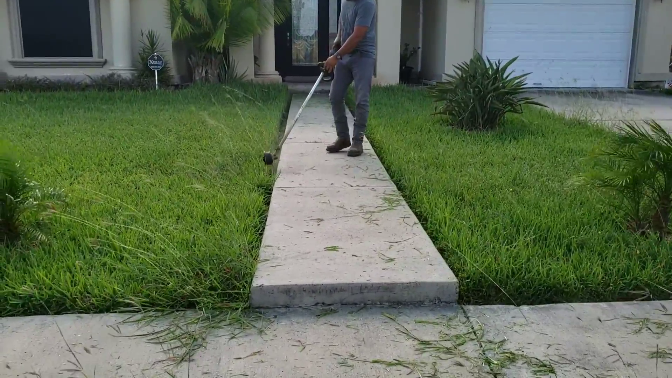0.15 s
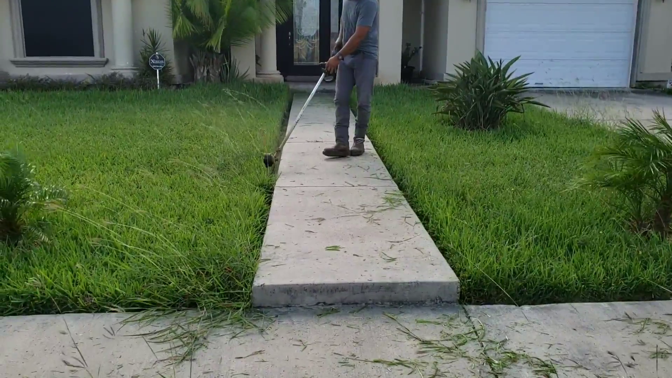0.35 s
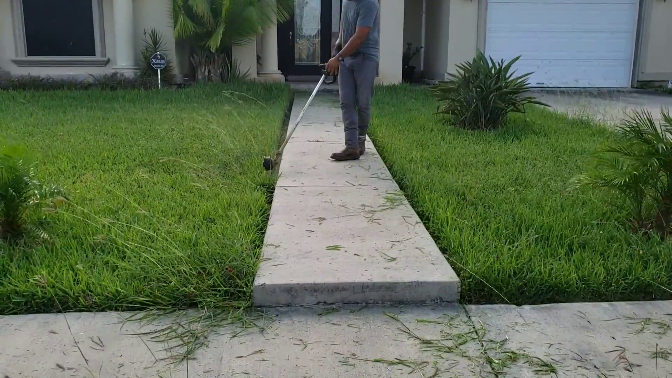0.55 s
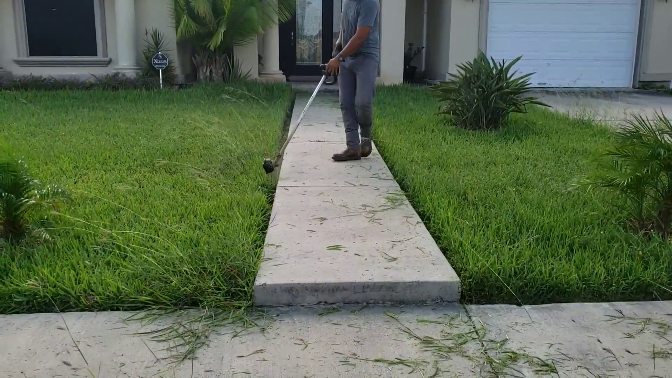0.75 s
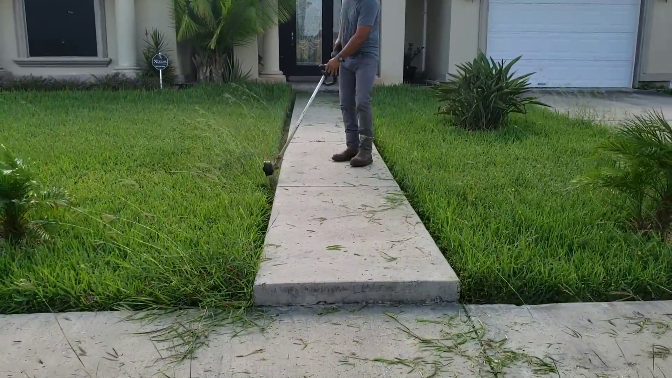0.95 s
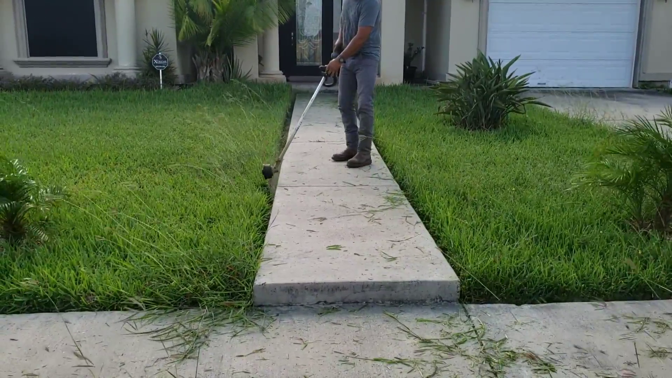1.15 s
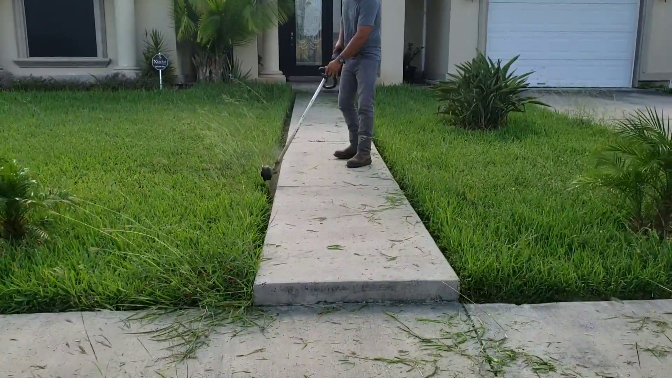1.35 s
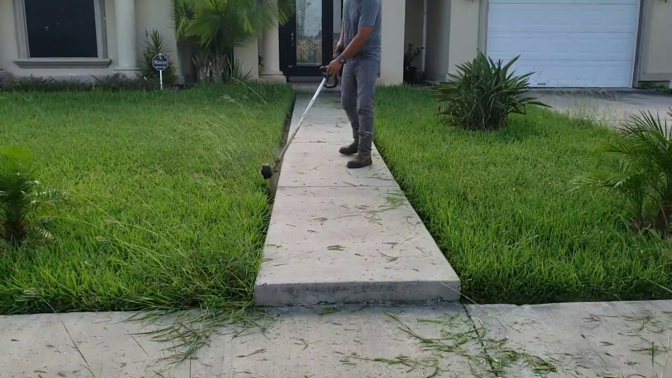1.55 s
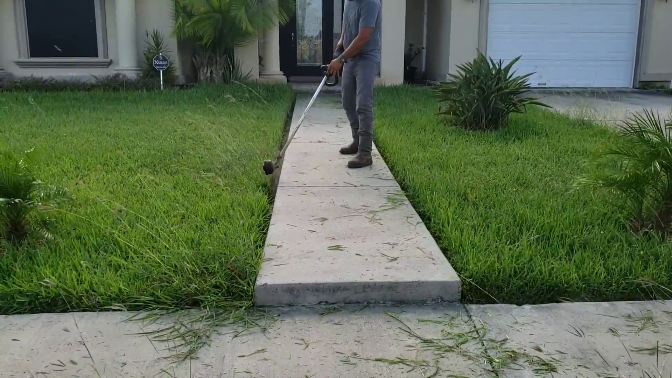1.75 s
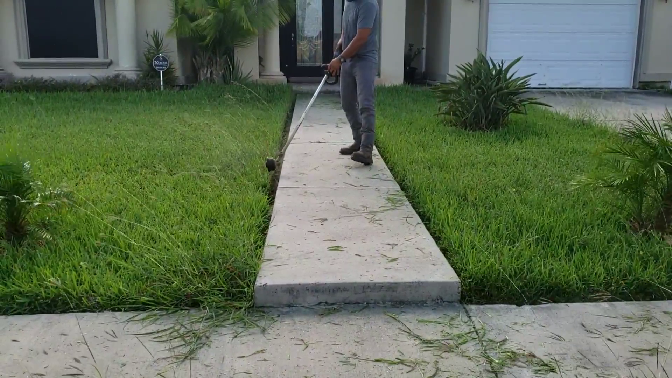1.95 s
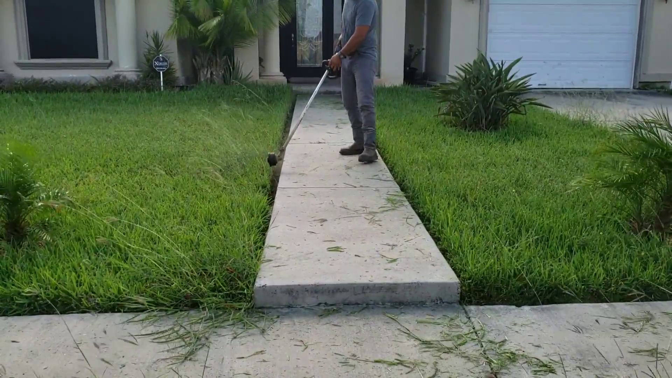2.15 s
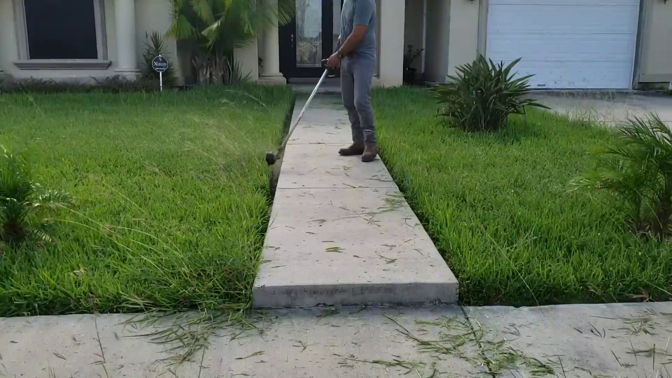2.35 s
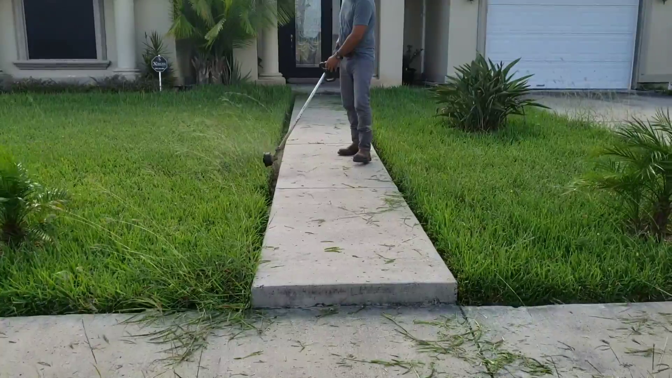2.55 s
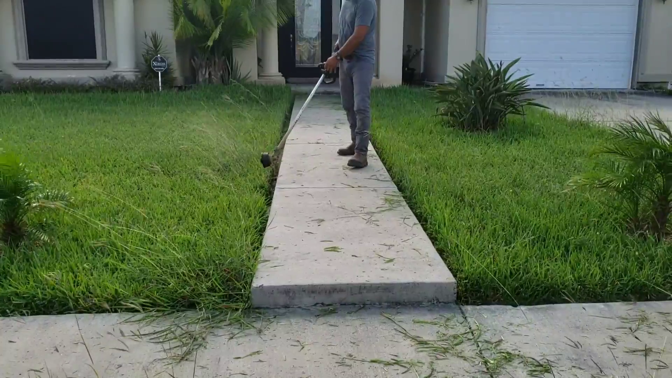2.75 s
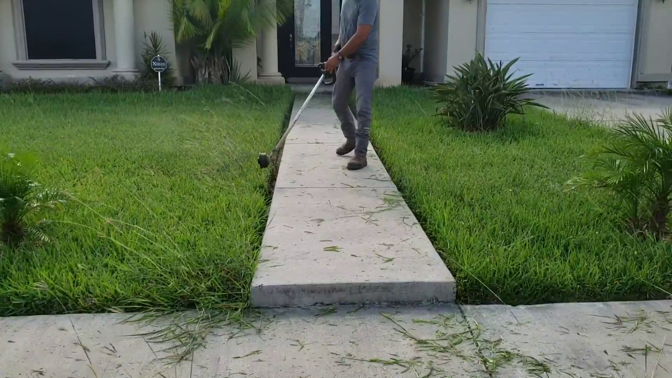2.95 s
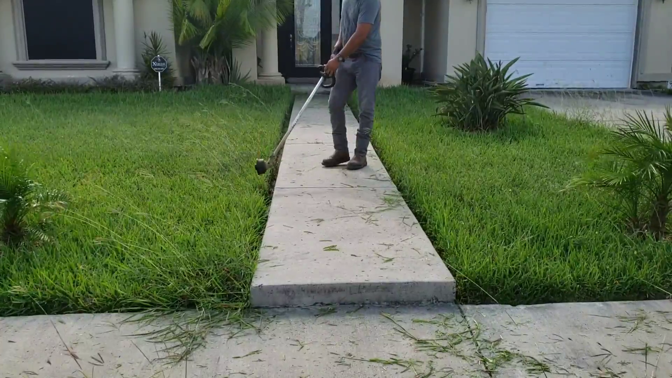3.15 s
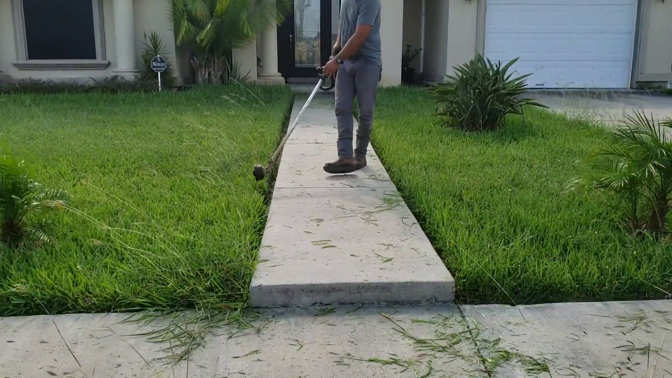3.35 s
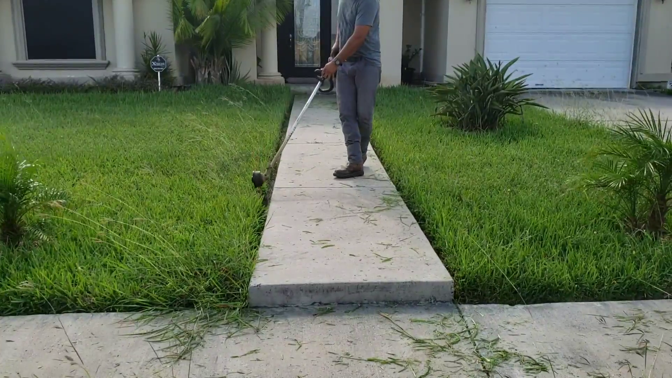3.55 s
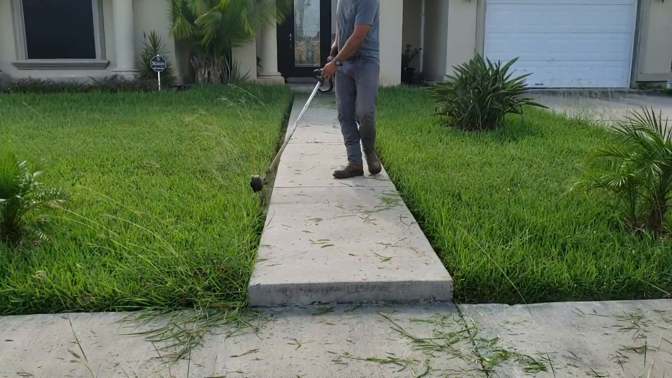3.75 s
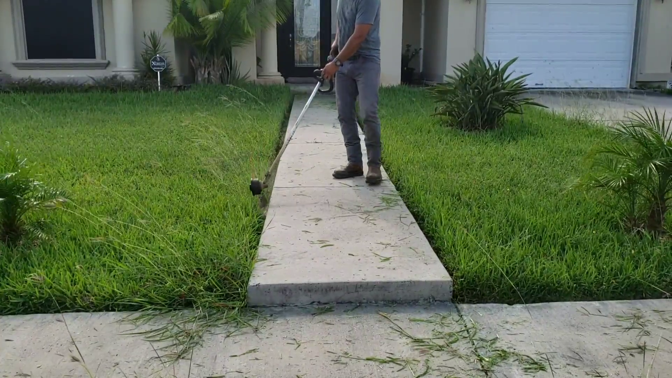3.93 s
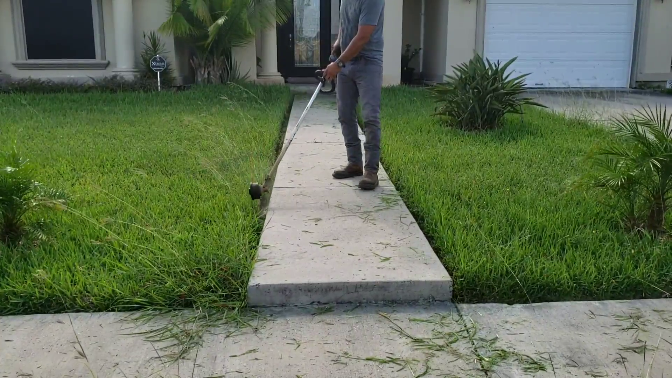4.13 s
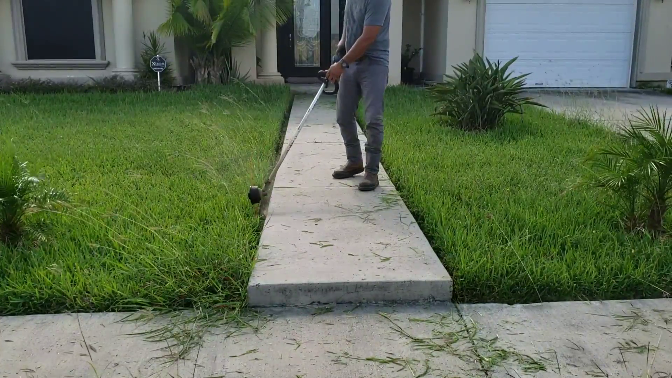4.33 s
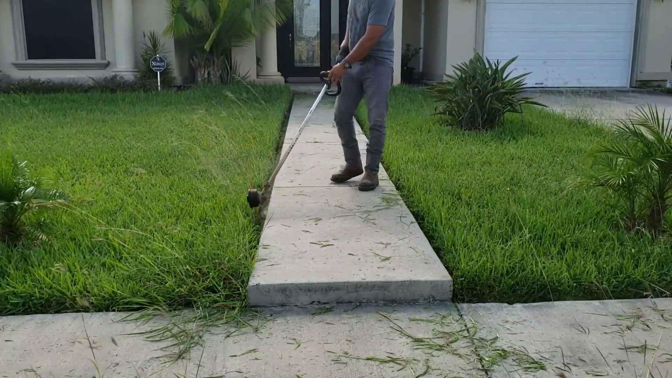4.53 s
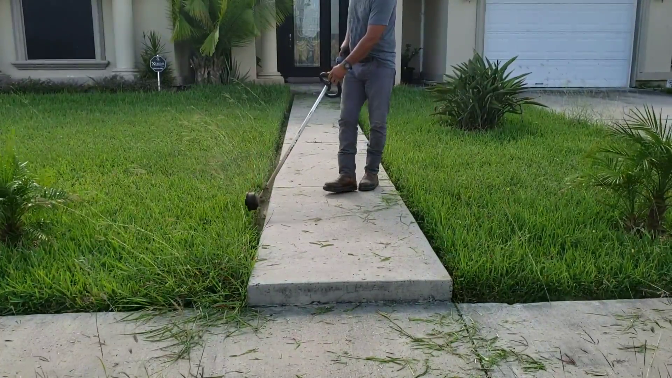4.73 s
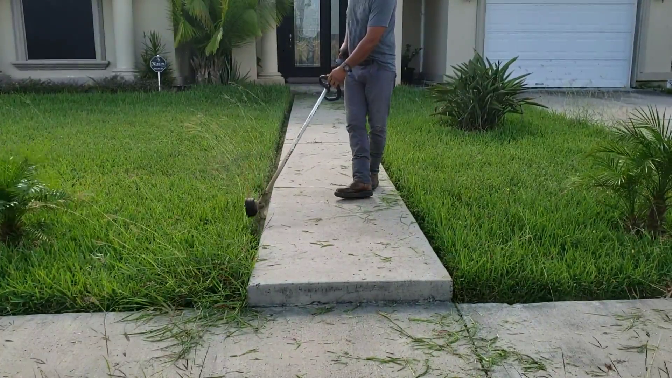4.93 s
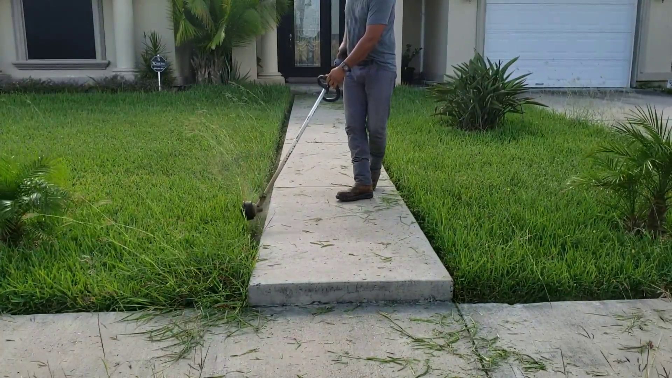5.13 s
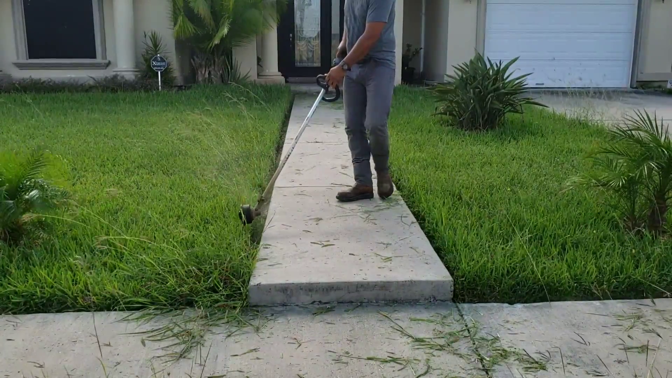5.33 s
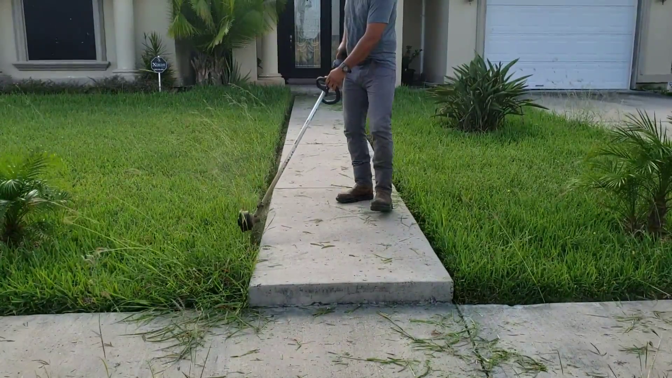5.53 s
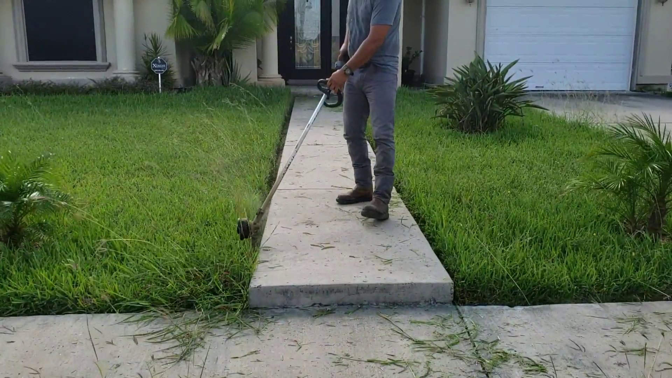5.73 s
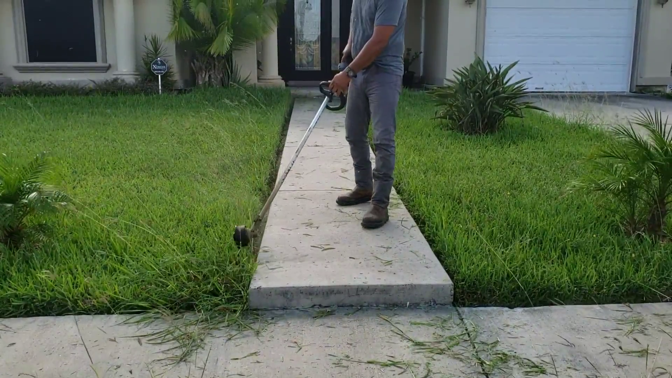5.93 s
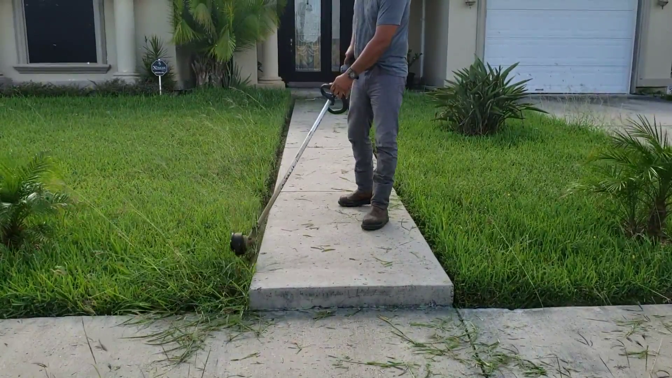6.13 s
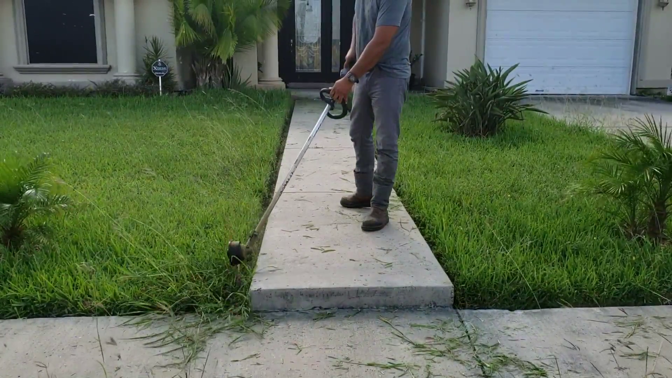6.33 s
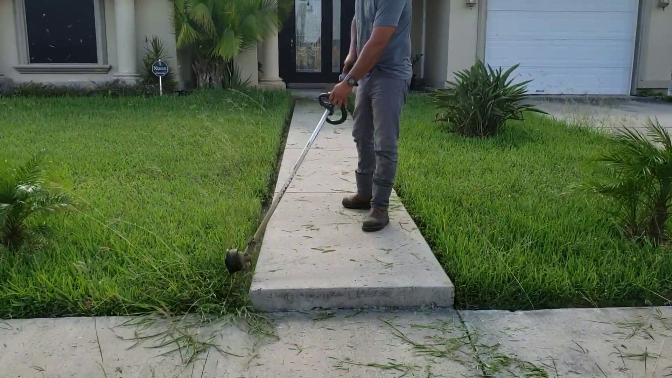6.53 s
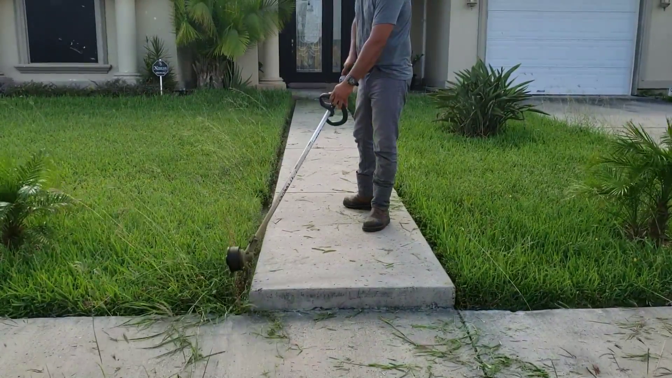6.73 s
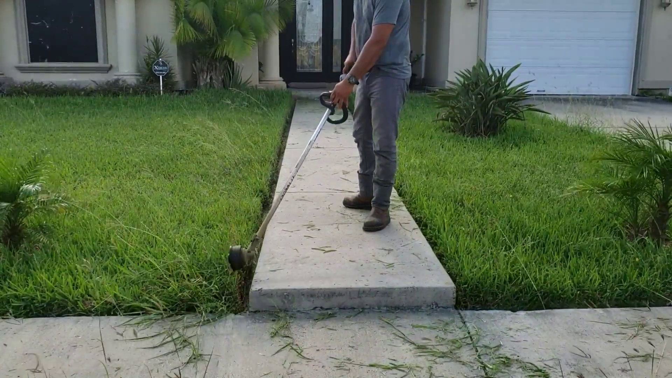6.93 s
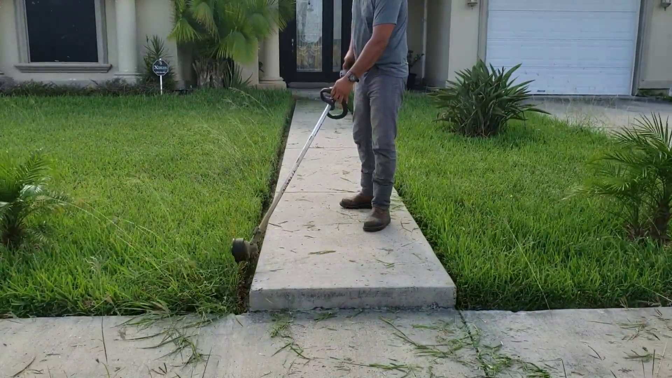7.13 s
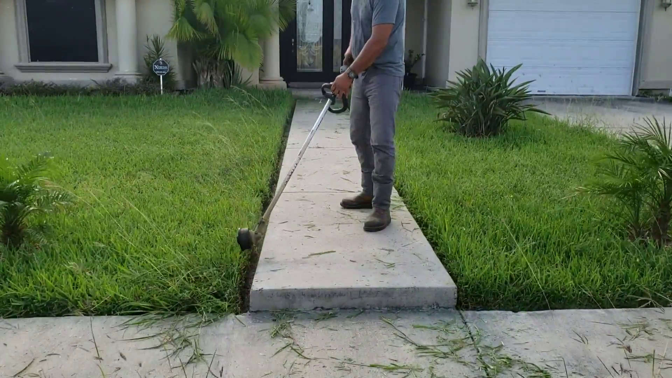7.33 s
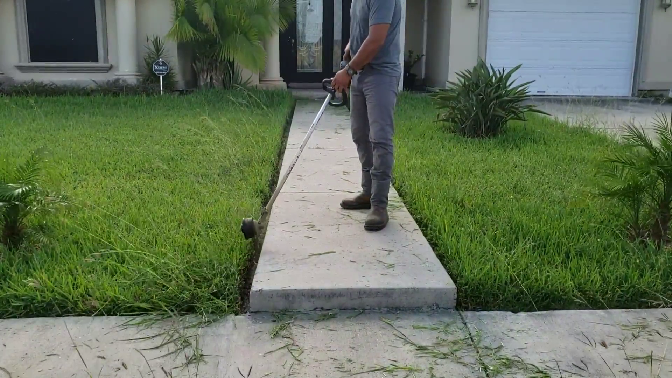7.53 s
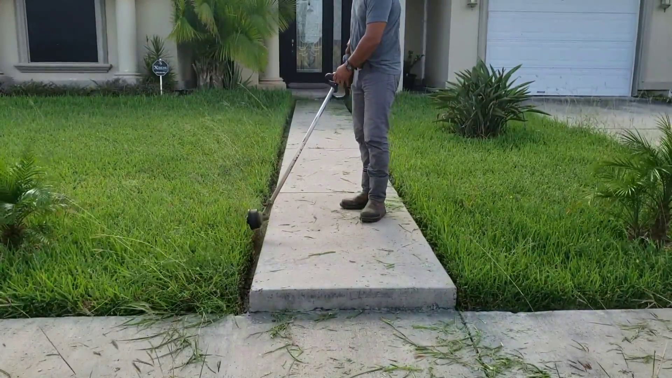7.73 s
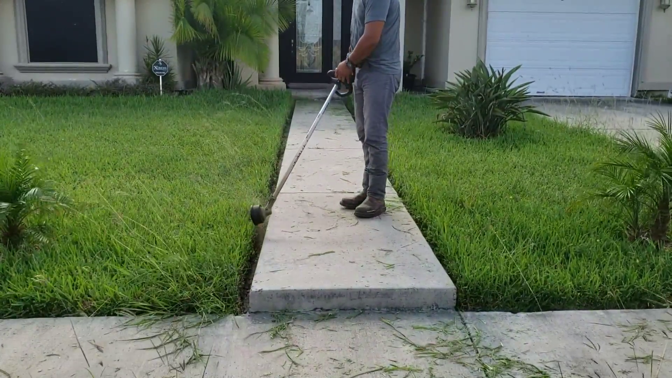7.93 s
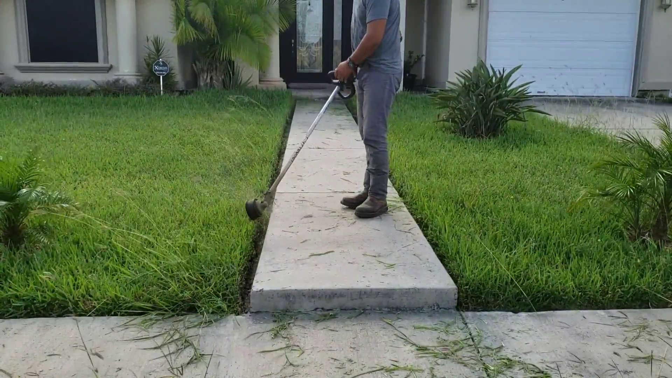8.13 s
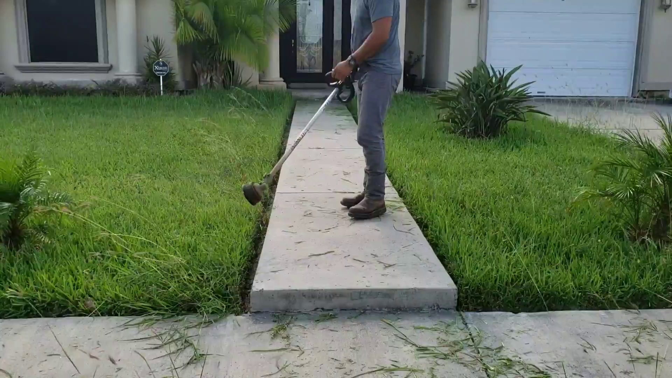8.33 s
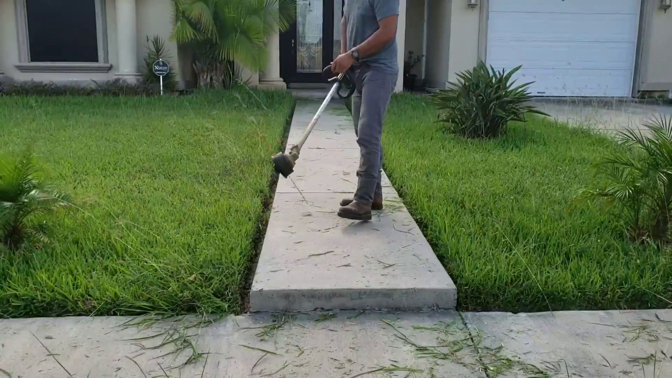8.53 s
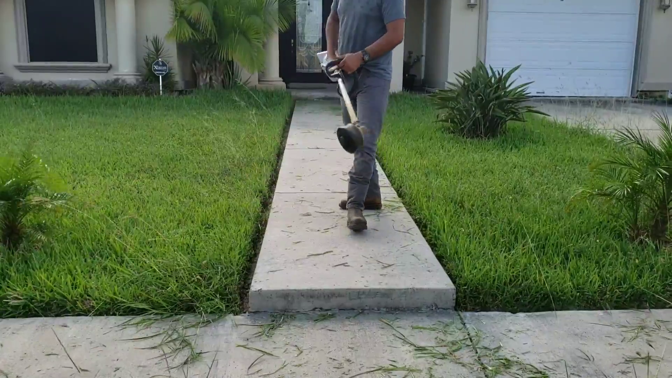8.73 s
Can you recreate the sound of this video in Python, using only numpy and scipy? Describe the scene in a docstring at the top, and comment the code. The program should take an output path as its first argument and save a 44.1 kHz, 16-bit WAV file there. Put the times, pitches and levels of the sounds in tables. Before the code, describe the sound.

Close outdoor grass trimming: steady droning small engine, bright fluttering line hiss, hard edge rasps and ticks, with brief dips in pitch and a whistling finish.

```python
"""Edge of a lawn by a paved path and a house front; a stereo microphone a few metres from a man trimming.
His four-stroke petrol string trimmer eases and pulls again; exhaust pulses ring a muffler and drone.
Two nylon lines shred grass in bursts of tiny snaps, whistle by shedding vortices and hum as they pass.
The bevel gear whines at its tooth rate; concrete cracks, grit ticks, and at the end the head lifts clear.
Wind buffets the microphone as lumpy low noise; the house front answers with a short scattered tail."""
import sys
import numpy as np
from scipy import signal
from scipy.fft import rfft, irfft, next_fast_len
from scipy.io import wavfile

SR = 44100
rng = np.random.default_rng(int(sys.argv[2]) if len(sys.argv) > 2 else 0)


def digitize_waveform(pressure):
    """Quantize a signal to 16-bit integers and store it at the path in sys.argv[1].

    Rows of a 2-D input are taken as channels; values are limited to [-1, 1].
    """
    field = np.atleast_2d(pressure).T
    bounded = np.clip(field, -1, 1)
    quanta = np.round(bounded * 32767).astype(np.int16)
    wavfile.write(sys.argv[1], SR, quanta)


N = 391608


def amp(db):
    """Decibels to gain."""
    return 10 ** (np.asarray(db) / 20)


def unit(x):
    """Scale to rms 1."""
    return x / np.sqrt(np.mean(x ** 2) + 1e-20)


def along(points, hz):
    """Read (f/Hz, value) points on a log frequency axis."""
    f, v = np.transpose(points)
    return np.interp(np.log(hz + 1), np.log(f + 1), v)


def curves(rows):
    """One value per sample for each column after the time."""
    s, *cols = np.transpose(rows)
    return [np.interp(np.arange(N) / SR, s, c) for c in cols]


def wobble(rate):
    """A smooth random curve, rate knots a second."""
    size = int(N * rate / SR) + 8
    fine = signal.resample(rng.standard_normal(size), 8 * size)
    return np.interp(np.arange(N) * 8 * rate / SR, np.arange(len(fine)), fine)


def filtered(x, response):
    """Multiply the spectrum of x by a response of frequency."""
    m = next_fast_len(N + 8192)
    return irfft(rfft(x, m) * response(np.fft.rfftfreq(m, 1 / SR)), m)[..., :N]


def coloured(x, spectrum):
    """x through a causal minimum-phase filter with the given (f/Hz, level/dB) spectrum, at rms 1."""
    size = 4096
    log_gain = np.log(amp(along(spectrum, np.fft.rfftfreq(size, 1 / SR))))
    # folding the cepstrum forward in time makes the filter causal
    cepstrum = irfft(log_gain)
    cepstrum[1:size // 2] *= 2
    cepstrum[size // 2 + 1:] = 0
    impulse = irfft(np.exp(rfft(cepstrum)))
    return unit(signal.oaconvolve(x, impulse[None], axes=1)[:, :N])


def noise():
    """Two unrelated white noises."""
    return rng.standard_normal((2, N))


def eddies(pitch, band_hz):
    """A band of noise around a moving pitch, at rms 1."""
    slow_noise = filtered(noise(), lambda hz: np.exp(-(hz / band_hz) ** 2))
    return unit(slow_noise * np.cos(2 * np.pi * np.cumsum(pitch) / SR))


def spread(pair, side_db):
    """The first signal in the middle, the second as width."""
    side = amp(side_db) * pair[1]
    return np.array([pair[0] + side, pair[0] - side])


def per_cycle(cycles):
    """A new normal random value for every cycle."""
    return rng.standard_normal(4000)[cycles.astype(int) % 4000]


# faint outdoor background: f/Hz, density/dB
AIR = [(100, -3), (800, -7), (2500, 1), (12000, -17), (15000, -18)]
AIR_DB = -62


def outdoor_air():
    """Distant outdoor air as a faint, steady coloured noise, unrelated at the two ports."""
    return amp(AIR_DB) * coloured(noise(), AIR)


# wind buffeting the microphone: t/s, relative level/dB
WIND = [(0, -39), (1.2, -37.5), (1.9, -41.5), (2.5, -40.5), (3.35, -39), (3.85, -48.5), (4.95, -53.5),
        (5.35, -44), (6.1, -51.5), (6.9, -57), (7.6, -52), (8.15, -42.5), (8.6, -43.5), (8.88, -53)]
# puffs of wind on the microphone: t/s, relative level/dB, half length/s, flutter relative to the puff/dB
PUFFS = [(0.176, -35, .025, -8), (0.347, -33, 0.014, -16), (0.451, -27.5, 0.016, 2),
         (0.526, -26.5, .022, -2.5), (0.644, -28.5, .018, -7), (.735, -38, .014, 0), (.885, -37, .02, -1),
         (1.082, -29.5, 0.043, -6), (1.192, -27.5, 0.019, -1.5), (1.26, -28.5, .015, -4),
         (1.303, -31, .013, 3), (1.567, -29, 0.028, -7), (1.706, -28.5, 0.014, -5), (1.93, -37, 0.014, 0),
         (2.062, -25.5, 0.019, -3.5), (2.385, -31.5, .06, -1), (2.514, -29.5, 0.023, 0),
         (2.56, -26.5, .016, -2), (2.99, -32.5, 0.064, -1), (3.118, -32, 0.024, -5), (3.332, -33, .03, -14),
         (7.151, -42, .022, -5), (7.818, -33.5, .018, -6.5)]
# spectra of the steady buffeting, the puffs and the bright flutter on them: f/Hz, relative density/dB
BUFFET = [(20, -24), (45, -8), (90, 0.5), (180, -0.5), (300, -6.5), (600, -18), (1200, -25.5), (3000, -29)]
PUFF = [(30, -12), (100, 0.5), (200, 1), (400, -10.5), (900, -26), (3000, -56)]
FLUTTER = [(80, -14), (250, 2), (450, -1), (850, 0.5), (1400, -11.5), (3000, -64)]


def wind():
    """Lumpy turbulence pushes each microphone port separately; puffs thump, with a brighter flutter on top."""
    t = np.arange(N) / SR
    lumps = amp(4.7 * np.array([wobble(50), wobble(50)]))
    rumble = amp(curves(WIND)[0] + 2.5) * unit(lumps * coloured(noise(), BUFFET))
    puff_force, flutter_force = np.zeros(N), np.zeros(N)
    for s, db, half, bright_db in PUFFS:
        swell = amp(db - 2.5) * np.exp(-((t - s) / half) ** 2)
        puff_force += swell
        flutter_force += swell * amp(bright_db)
    puffs = puff_force * coloured(noise(), PUFF) + flutter_force * coloured(noise(), FLUTTER)
    return rumble + puffs * amp(2.5 * np.array([wobble(90), wobble(90)]))


# decay of the tail from house front and path: f/Hz, time to fall 60 dB/s
YARD = [(200, 0.053), (2000, 0.099), (12000, 0.02)]


def yard(x):
    """The house front and the path scatter a short tail, ever new as the man moves."""
    hop = SR // 8
    out = np.zeros((2, N + SR))
    padded = np.pad(x, ((0, 0), (hop, 2 * hop)))
    window = np.sqrt(np.hanning(2 * hop))
    for start in range(0, N + hop, hop):
        hz, t, z = signal.stft(rng.standard_normal((2, SR // 4)), SR, nperseg=256)
        decay = amp(-60 * t / along(YARD, hz)[:, None])
        tail = signal.istft(z * decay, SR, nperseg=256)[1]
        tail = tail / np.linalg.norm(tail[0])
        piece = signal.fftconvolve(padded[:, start:start + 2 * hop] * window, tail, axes=1)
        out[:, start:start + piece.shape[1]] += piece
    return out[:, hop:hop + N]


# head speed that full throttle reaches under the changing load: t/s, turns per second
SPEED = [(0, 88.2), (.22, 87.8), (.45, 89.7), (.7, 87.8), (.79, 85), (.9, 84.6), (1.18, 87.1), (1.32, 86),
         (1.87, 83), (2.08, 85), (2.3, 83.7), (2.52, 79), (2.8, 83.7), (3.5, 85.2), (3.7, 87.5), (4, 87),
         (4.2, 87.5), (4.35, 86.3), (4.5, 87.8), (4.97, 89.4), (5.2, 84.7), (5.6, 88.2), (5.72, 86.9),
         (6, 86.1), (6.42, 85.8), (6.55, 86.6), (6.7, 85), (7.1, 88.8), (7.95, 88.8)]
# the trigger is let go and squeezed again: off t/s, on t/s
EASES = [(1.32, 1.548), (2.81, 3.166), (6.7, 6.92), (7.96, 8.5), (8.75, 8.85)]
COAST_S, SPIN_UP_S = .48, .19  # time constants of slowing and speeding up
THROTTLE_S, PICKUP_S = 0.11, .04  # lever travel time; delay before the engine pulls again


def throttle():
    """The head coasts when the trigger is let go and spins up again; surge is how hard the engine pulls."""
    t = np.arange(N) / SR
    share, lever = np.ones(N), np.ones(N)  # share of full speed; lever position 0-1
    for off, on in EASES:
        coast = np.interp(off, t, share) * np.exp(-(np.clip(t, off, on) - off) / COAST_S)
        recovering = 1 - (1 - coast) * np.exp(-np.maximum(t - on, 0) / SPIN_UP_S)
        share = np.where(t < off, share, recovering)
        travel = np.maximum(off + THROTTLE_S - t, t - on - PICKUP_S) / THROTTLE_S
        lever = np.where(t < off, lever, np.clip(travel, 0, 1))
    surge = lever * (1 - share)
    return curves(SPEED)[0] * share, surge, lever


FULL_SPEED = 87  # head turns per second at which effort adds no speed-dependent change


def effort(speed, surge, slope_db, surge_db):
    """Level change in dB: slope_db per tenfold speed, plus surge_db times the engine's surge."""
    return slope_db * np.log10(speed / FULL_SPEED) + surge_db * surge


HEAD_TEETH, PINION_TEETH = 21, 15


def power_strokes(turns):
    """The engine fires every second crank turn and drives the head through the bevel gear."""
    return turns * HEAD_TEETH / PINION_TEETH / 2


# exhaust resonances, others favoured by the ground reflection as the man comes nearer:
# f/Hz, width/Hz, far level/dB, near level/dB
PIPE = [(120, 29, -3, -8), (240, 70, -5, -9), (670, 30, -7, 3), (735, 34, 4, 5.5), (840, 40, -1, 5),
        (912, 40, 1.5, 1), (985, 50, -2, -8)]


def muffler(fired, column):
    """Firing pulses ring the exhaust resonances, with the strengths of one column."""
    def ring(f):
        total = 0
        for k, row in enumerate(PIPE):
            damping = 1j * f * row[1]
            total = total + amp(row[column]) * damping / (row[0] ** 2 - f * f + damping) * (-1) ** k
        return total
    return unit(filtered(fired, ring))


# engine noise as the man turns and walks: t/s, relative gas rush level/dB, relative rattle level/dB
ENGINE = [(0, -45.5, -37), (1.2, -38, -37.5), (1.9, -41.5, -41.5), (2.45, -36.5, -36), (2.9, -42.5, -45.5),
          (3.5, -40.5, -40.5), (4, -48, -42), (4.8, -55, -42.5), (5.8, -42, -41), (7.1, -54, -50.5),
          (8, -45.5, -42), (8.6, -37, -39.5), (8.88, -67, -42.5)]
# exhaust note as the man turns and walks, before throttle and effort: t/s, level/dB
NOTE = [(0, -51), (1.2, -49), (1.8, -52), (2.1, -50), (2.8, -52), (3.2, -51), (3.5, -46), (3.9, -46),
        (4.3, -46.5), (5, -47.5), (6.2, -47.5), (6.7, -52), (7.3, -56), (7.8, -51), (8.3, -52), (8.62, -41),
        (8.74, -48), (8.88, -54)]
# how far he has come along the path: t/s, nearness 0-1
APPROACH = [(4.9, 0), (5.4, 1)]
# spectra of the gas rush through the muffler and of the mechanical rattle: f/Hz, relative density/dB
MUFFLER = [(50, -38), (120, -8.5), (185, -3), (250, -2.5), (370, -5.5), (520, -25), (620, -8), (720, 2),
           (900, 1), (1060, -5.5), (1250, -5), (2000, -18.5), (3200, -36), (6000, -45)]
RATTLE = [(300, -10), (550, -14), (750, 4.5), (1050, -2), (1400, -2.5), (1900, 4.5), (2250, -2.5),
          (2600, 1.5), (3000, -10.5), (4500, 0.5), (9000, -42)]
SHUT_DB = -13  # drop of the exhaust note and of the hum's overtones with the throttle shut
MISFIRE = .16  # timing scatter of the firings with the throttle shut, in cycles


def engine(speed, surge, turns, lever):
    """One exhaust pulse every second crank turn rings the muffler; gas rush, valves and fan add noise."""
    gas_db, rattle_db = curves(ENGINE) + effort(speed, surge, slope_db=19.0, surge_db=22)
    firings = power_strokes(turns)
    # starved of fuel, it fires weakly and unevenly
    shut = 1 - lever
    uneven = np.maximum.accumulate(firings + MISFIRE * shut * wobble(60))
    strength = amp((.35 + 3 * shut) * per_cycle(uneven))
    fired = np.diff(np.floor(uneven), prepend=0) * strength
    near = curves(APPROACH)[0]
    note_db = curves(NOTE)[0] + SHUT_DB * shut + effort(speed, surge, slope_db=65, surge_db=8)
    ringing = (1 - near) * muffler(fired, column=2) + near * muffler(fired, column=3)
    note = amp(note_db) * unit(ringing)
    gate = np.exp(0.6 * np.cos(2 * np.pi * firings))  # the noise swells at each firing
    gas = amp(gas_db - 5.5 + wobble(16)) * coloured(gate * noise(), MUFFLER)
    rattle = amp(rattle_db - 2.0 + 2.5 * wobble(14)) * coloured((1.5 + gate) * noise(), RATTLE)
    return note + spread(gas + rattle, -13.5)


# bevel gear whine as it turns toward and away from the microphone: t/s, relative level/dB
GEAR = [(0, -46), (1, -46), (2.1, -48.5), (2.75, -48.5), (2.95, -60), (3.5, -46.5), (4.2, -50), (4.9, -49),
        (5.7, -49.5), (6.1, -57), (7.45, -64), (7.58, -49.5), (8, -52), (8.6, -75)]
GEAR_SLOPE_DB = 73  # the whine's growth per tenfold speed


def gear_whine(speed, turns):
    """Meshing bevel teeth whine at the tooth rate, swelling once a turn and louder with speed."""
    mesh = 2 * np.pi * HEAD_TEETH * turns + .2 * wobble(40)
    level_db = curves(GEAR)[0] + GEAR_SLOPE_DB * np.log10(speed / FULL_SPEED)
    once_a_turn = 1 + .3 * np.sin(2 * np.pi * turns)
    return amp(level_db + 1.0 * wobble(14)) * once_a_turn * np.sin(mesh)


# hum as the head is swung and tilted: t/s, relative fundamental level/dB, overtone level/dB, tilt 0-1
SWING = [(0, -48, -54, 0), (.5, -49, -57, .5), (1.25, -50, -55, .5), (1.8, -51, -58, 0),
         (2.35, -48, -53, .2), (2.75, -52, -58, 0), (3.5, -51, -55, 0), (3.8, -52, -52.5, 0),
         (4.1, -53.5, -60, .3), (4.9, -52.5, -61, 0), (5.3, -54.5, -57, .2), (6.2, -54.5, -56, .5),
         (6.55, -56, -48.5, 1), (6.75, -58, -51, 1), (7.05, -60, -62, .3), (7.45, -57, -60, .3),
         (7.75, -54, -52, 0), (8.2, -55, -55, 0), (8.6, -55, -57, .4)]
# overtones of the line-pass rate: multiple, level upright/dB, level tilted/dB
HUM = [(2, -15, -14), (3, -14, -9), (4, -10, -4), (5, 0, -2.5), (6, -3, 1.5), (7, -8, -6), (8, -6.5, -9)]
# the ground reflection cancels the overtones here: f/Hz, level change/dB
GROUND_DIP = [(370, 0), (440, -9), (600, -11), (680, 0)]
HUM_SLOPE_DB = 75  # the hum's growth per tenfold speed


def line_hum(speed, turns, lever):
    """Two lines push the air twice a turn; overtones follow the tilt and drop as the throttle shuts."""
    fundamental_db, overtones_db, tilt = curves(SWING)
    overtones_db = overtones_db + SHUT_DB * (1 - lever)
    partials = [(1, fundamental_db)]
    for k, upright, tilted in HUM:
        shape_db = (1 - tilt) * upright + tilt * tilted
        partials.append((k, overtones_db + shape_db + along(GROUND_DIP, 2 * k * speed)))
    hum = 0
    for k, db in partials:
        hum = hum + amp(db + wobble(5)) * np.sin(4 * np.pi * k * turns + .15 * wobble(12))
    return hum * amp(HUM_SLOPE_DB * np.log10(speed / FULL_SPEED))


def head(speed, turns, lever):
    """The turning head radiates the gear whine and the hum of the passing lines."""
    return np.sqrt(2) * (gear_whine(speed, turns) + line_hum(speed, turns, lever))


SLAP_PASSES = .06  # fade of the slap as a tip lands, in passes


def landings(passes):
    """A sharp spike as each tip lands, of uneven size."""
    since = passes - .35
    return np.exp(-(since % 1) / SLAP_PASSES) * amp(2.5 * np.clip(per_cycle(since), -2, 1.5))


# the line is pressed deep into the edge, so that its passes stumble: t/s, depth 0-1
DEPTH = [(4.9, 0), (5.1, 1), (6.6, 1), (6.9, 0)]
STUMBLE = .1  # added timing scatter of a deep pass, in passes


def snaps(turns, focus, between, scatter_db, grain_db, slap):
    """Each line pass lands with a slap and tears a bunch of blades: a burst of tiny uneven snaps."""
    passes = 2 * turns
    stray = (0.091 + STUMBLE * curves(DEPTH)[0]) * wobble(300)
    burst = np.exp(focus * (np.cos(2 * np.pi * (passes + stray) - np.pi) - 1))
    force = between + burst * amp(scatter_db * np.clip(per_cycle(passes), -1.8, 1.8))
    return (force * amp(grain_db * wobble(2500)) + slap * landings(passes)) * noise()


# the line scuffing soil and concrete, before effort: t/s, level/dB
SCUFF = [(4.9, -56), (5.1, -37), (5.38, -51.5), (5.87, -38.5), (6.66, -43.5), (7.33, -45.5), (7.48, -56),
         (7.62, -44.5), (8.1, -40.5)]


def scuff(speed, surge, turns):
    """Later along the path the line also scuffs the soil: a dull rasp at every pass."""
    start, end = SCUFF[0][0], SCUFF[-1][0]
    level_db, = curves([(start - .1, -90), *SCUFF, (end + 0.28, -90)])
    dull = [(600, -26.5), (900, -6.5), (1150, -8.5), (1500, -11.5), (2500, -17.0), (5000, -59)]
    rasp = coloured(snaps(turns, focus=1, between=0.33, scatter_db=6.5, grain_db=2, slap=2.4), dull)
    return amp(level_db + effort(speed, surge, slope_db=58, surge_db=-10)) * spread(rasp, -18)


# grit struck by the line: t/s, relative strike level/dB
GRIT = [(0.7394, -15), (2.4094, -24), (2.482, -20), (3.2116, -17.5), (3.2495, -17), (3.4962, -15),
        (5.1264, -10), (6.1314, -15), (6.2484, -16), (7.9645, -11), (8.0125, -13), (8.239, -24),
        (8.534, -26.5), (8.662, -16)]


def grit():
    """Small stones flicked by the line: sharp ticks of bright noise that fade within milliseconds."""
    force, t = np.zeros(N + SR), np.arange(SR // 20) / SR
    for s, db in GRIT:
        force[round(s * SR):][:len(t)] += amp(db - 5.0 - 60 * t / 0.025)  # 60 dB in 25 ms
    return force[:N] * coloured(noise(), [(500, -47), (2000, 7), (6000, 7), (12000, 22), (15000, 8)])


# the tips skitter over bare concrete: t/s, length/s, relative crack level/dB
SKITTERS = [(.735, .014, -21), (1.578, .018, -20), (2.521, .022, -15), (3.247, .012, -20),
            (3.342, .014, -16), (5.826, .012, -13), (7.537, .012, -18), (7.728, .022, -14),
            (7.83, .07, -17), (8.495, .02, -36), (8.535, .035, -27)]


def skitter(turns):
    """On bare concrete every pass is a hard crack."""
    t = np.arange(N) / SR
    force = sum(amp(db) * ((t > s) & (t < s + length)) for s, length, db in SKITTERS)
    crack = coloured(noise(), [(500, -25), (2000, -5), (6000, -5), (12000, 3), (15000, -3)])
    return force * landings(2 * turns) * crack


# air whistle of the lines, loudest once the head is clear, before effort: t/s, relative level/dB
WHISTLE = [(0, -31), (3.6, -30.5), (4.6, -35.5), (6.2, -35), (7.45, -39.5), (7.65, -38), (8.28, -24.5),
           (8.52, -34.5), (8.7, -19.5)]
# the head is lifted clear and turned: t/s, share of the approaching tip's whistle that is heard
LIFT = [(8.5, .31), (8.72, .9)]


def whistle(speed, surge, turns, shed_hz=5550, doppler=.24, band_hz=850):
    """Each line sheds vortices at a pitch that rises with speed: lower receding, higher approaching."""
    pitch = shed_hz * (speed / 63) ** 0.73  # shed_hz and doppler hold at 63 turns per second
    swing = doppler * speed / 63 * np.abs(np.sin(2 * np.pi * turns))
    receding = eddies(pitch / (1 + swing), band_hz)
    approaching = eddies(pitch / (1 - swing), band_hz)
    tips = (receding + curves(LIFT)[0] * approaching) / np.sqrt(2)
    # flat out, the slower inner part of the line fills in below the tips
    inner_spectrum = [(2500, -26.0), (3600, -14.5), (4400, 1.0), (5100, -2.5), (5900, -12.5), (8000, -8.5)]
    inner = coloured(noise(), inner_spectrum)
    fast = np.clip((speed - 60) / 20, 0, .95)
    level_db = curves(WHISTLE)[0] + effort(speed, surge, slope_db=46, surge_db=11.0)
    return amp(level_db) * (np.sqrt(1 - fast) * 1.4 * tips + np.sqrt(fast) * 0.67 * inner)


# the line slips off the grass for a moment: t/s, length/s, level change/dB
SLIPS = [(1.116, 0.084, -3.5), (2.13, 0.064, -3), (6.315, 0.018, -3), (7.507, .07, -0.5)]


def contact_db():
    """The cutting noise dips while the line slips off the grass."""
    t = np.arange(N) / SR
    return sum(db * np.exp(-(2 * (t - s) / length) ** 2) for s, length, db in SLIPS)


# how hard the line is fed in, before effort: t/s, relative grass shred level/dB, hard edge bite level/dB
CUT = [(0, -30.5, -38), (.6, -29.5, -35), (1.15, -28.5, -32), (1.5, -28.5, -25.5), (2.1, -29, -40),
       (2.35, -28.5, -38), (2.85, -27, -25.5), (3.2, -28.5, -30), (3.65, -27, -24), (4.5, -32.5, -24),
       (5.25, -30, -22.5), (6.2, -27, -18.5), (6.7, -33, -25), (7.1, -33.5, -31), (7.45, -37, -28.5),
       (7.65, -31, -22.5), (8, -29, -24), (8.26, -29.5, -31.5), (8.35, -25.5, -39), (8.75, -29.5, -34)]
# the line catches the edge of the path for a moment: t/s, level/dB
CATCHES = [(1, -25.5), (1.209, -30), (1.7, -26), (2.55, -24), (2.77, -31), (3.36, -24), (7.96, -22),
           (8.68, -34)]
# the head leaves the grass: t/s, clear 0-1
CLEAR = [(8.26, 0), (8.33, 1)]
# spectra of grass shredding and of the rasp on the hard edge: f/Hz, relative density/dB
SHRED = [(900, -39), (2000, -15), (3000, -18), (4600, -8), (5800, -10.5), (7200, -1.5), (9500, -2),
         (11500, 0.5), (14000, -2), (15400, 1)]
BITE = [(6000, -35.5), (9300, -14), (10500, -4), (11800, 1.5), (12900, -4), (14000, -21), (15400, -24)]
CATCH_S = 0.033  # half length of a catch
KICK_DB = 2.6  # each power stroke drives a deeply pressed line harder into the edge
SLOW_FOCUS = 1.5  # how much more distinct the bursts are at low speed


def cutting(speed, surge, turns):
    """Soft grass hisses broadly, the hard edge of the path rasps sharper; a coasting line chirps instead."""
    t = np.arange(N) / SR
    shred_db, bite_db = curves(CUT)
    shred_db = shred_db + effort(speed, surge, slope_db=73, surge_db=16.5)
    bite_db = bite_db + effort(speed, surge, slope_db=31.0, surge_db=-6)
    catches = sum(amp(db) * np.exp(-((t - s) / CATCH_S) ** 2) for s, db in CATCHES)
    tufts = wobble(45)
    touching = 1 - curves(CLEAR)[0]
    distinct = SLOW_FOCUS * touching * np.clip(1 - speed / FULL_SPEED, 0, 1)
    stroke = np.cos(2 * np.pi * power_strokes(turns) + .8 * wobble(15))
    kick = amp(KICK_DB * curves(DEPTH)[0] * (stroke - .15))
    grass_snaps = snaps(turns, focus=0.14 + distinct, between=1.0, scatter_db=1.9, grain_db=1.34,
                        slap=0.8 * touching)
    edge_snaps = snaps(turns, focus=0.69 + distinct, between=0.78, scatter_db=2.0, grain_db=2.4, slap=1.4)
    shred = coloured(grass_snaps, SHRED)
    bite = kick * coloured(edge_snaps, BITE)
    # each tip beams its drag tone forward as it swings toward the listener, once a pass
    toward = np.exp(1.3 * np.cos(4 * np.pi * turns - np.pi))
    chirps = unit(toward * eddies(np.minimum(222 * speed, 12500), band_hz=1900))
    coasting = touching * np.clip((80 - speed) / 18, 0, .7)
    edge = np.sqrt(1 - coasting) * bite + np.sqrt(coasting) * chirps
    edge_level = np.hypot(amp(bite_db + 0.22 * tufts), catches)
    return amp(shred_db + 7.5 + 0.99 * tufts) * shred + edge_level * edge


# where the head is: t/s, left-right balance/dB, nearness 0-1
BEARING = [(0.6, 0, 0), (3.7, .3, .6), (6, 1, 1), (7.4, 1, .75), (8.8, -.5, .4)]
# the two microphone ports: f/Hz, side-to-mid level far/dB, side-to-mid level near/dB,
# share of the side that is direct sound (negative where the left port leads by over half a cycle)
WIDTH = [(1500, -5, -14, 0.2), (3499, -45, -9, 0.7), (5540, -42, 1, 0.6), (6300, 8.5, 0.5, -.18),
         (8340, -1.5, 4, -0.17), (10000, 7.5, -4, -0.7), (11800, 4, -19, -.7), (15030, 0.5, -2.5, -0.5)]


def ports(pair):
    """Head sound reaches the left port first, the other width is scattered; both change with nearness."""
    table = np.array(WIDTH)

    def direct(hz):
        return np.clip(along(table[:, ::3], hz), -1, 1)

    def widened(side, column):
        return filtered(side, lambda hz: amp(along(table[:, [0, column]], hz)))

    direct_side = filtered(pair[0], lambda hz: 1j * direct(hz))  # a quarter cycle from the middle
    scattered_side = filtered(pair[1], lambda hz: np.sqrt(1 - direct(hz) ** 2))
    side = direct_side + scattered_side
    balance_db, near = curves(BEARING)
    side = (1 - near) * widened(side, 1) + near * widened(side, 2)
    return np.array([pair[0] + side, pair[0] - side]) * amp(np.array([[1], [-1]]) * balance_db / 2)


def scene():
    """The head's speed drives every part of the machine; yard, wind and outdoor air surround it."""
    speed, surge, lever = throttle()
    turns = np.cumsum(speed) / SR
    contact = amp(contact_db())
    cut = contact * cutting(speed, surge, turns)
    line = ports(cut + whistle(speed, surge, turns) + grit() + skitter(turns))
    motor = engine(speed, surge, turns, lever) + head(speed, turns, lever)
    motor = (motor + contact * scuff(speed, surge, turns)) * amp([[-.5], [.5]])  # slightly to the right
    echo = yard(amp(-4) * line + amp(-11) * motor)
    return line + motor + echo + wind() * amp([[-.6], [.6]]) + outdoor_air()


TOP_HZ = 15520  # band limit


def record(dry):
    """The sharpest ticks are rounded off, and a steep filter cuts the treble at the band limit."""
    rounded = dry / (1 + np.abs(dry / .9) ** 6) ** (1 / 6)
    return filtered(rounded, lambda hz: 1 / (1 + (hz / TOP_HZ) ** 400))


dry = scene()
out = record(dry)
digitize_waveform(out)
```